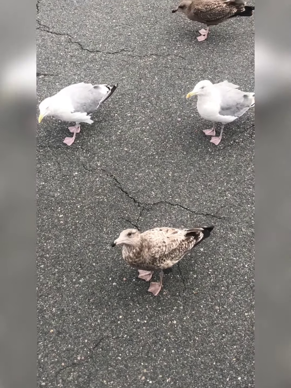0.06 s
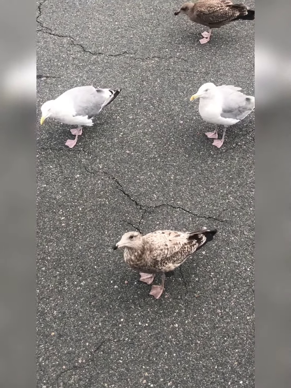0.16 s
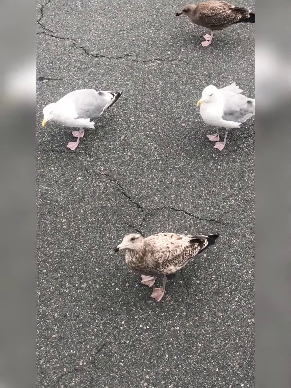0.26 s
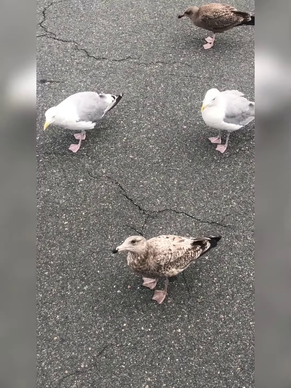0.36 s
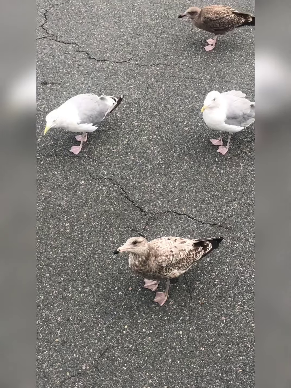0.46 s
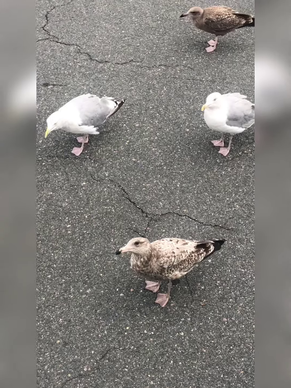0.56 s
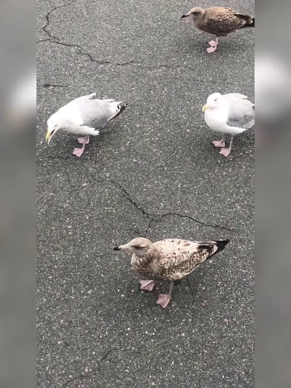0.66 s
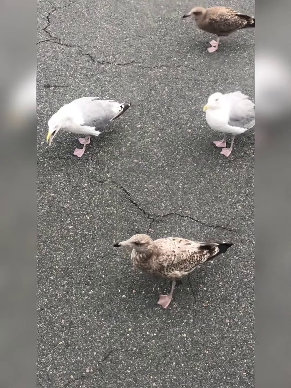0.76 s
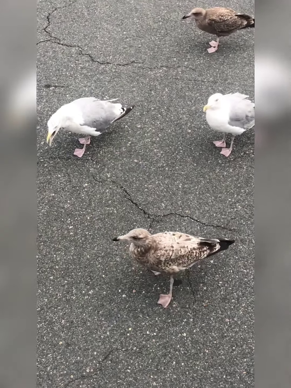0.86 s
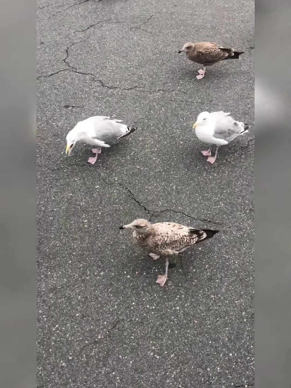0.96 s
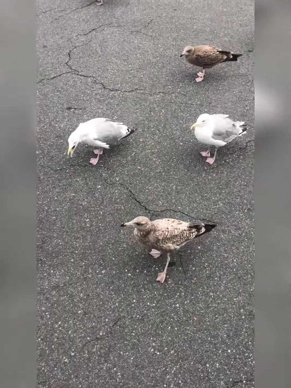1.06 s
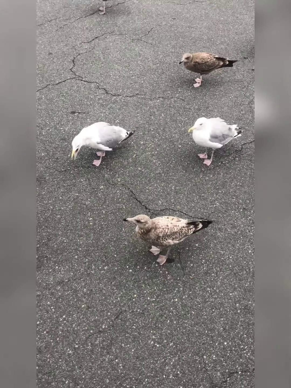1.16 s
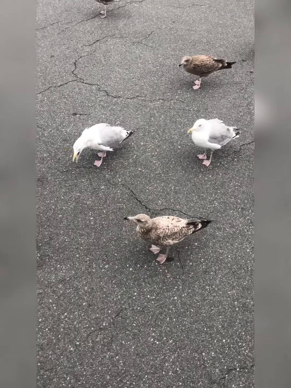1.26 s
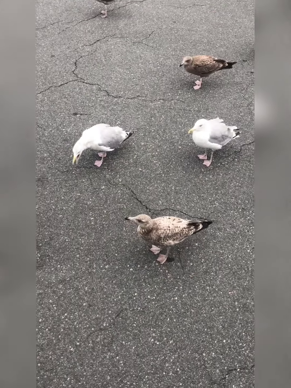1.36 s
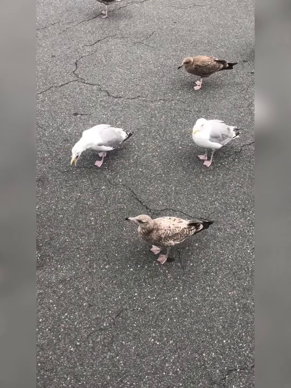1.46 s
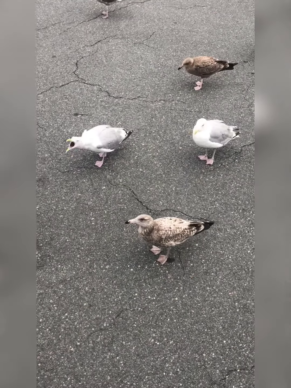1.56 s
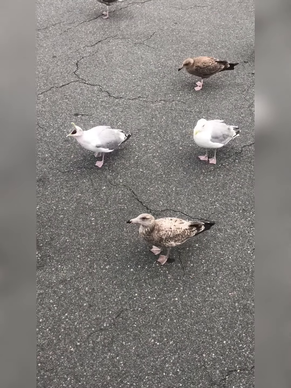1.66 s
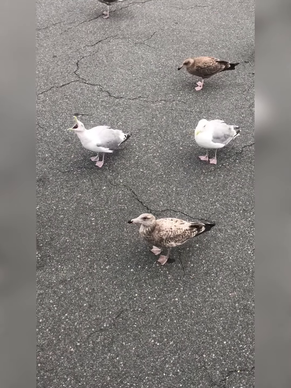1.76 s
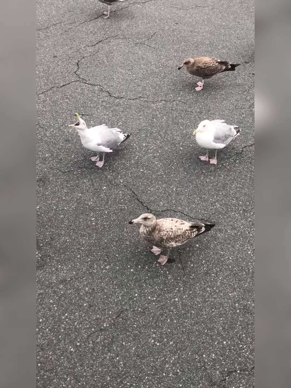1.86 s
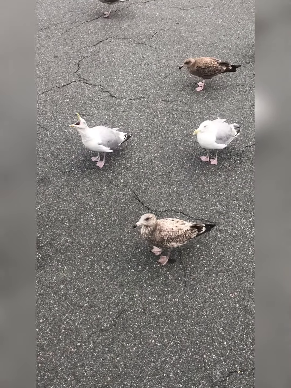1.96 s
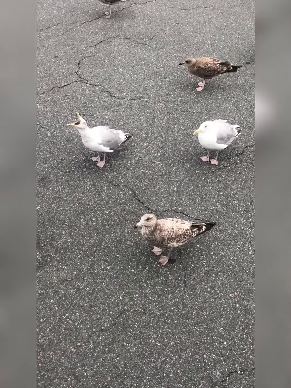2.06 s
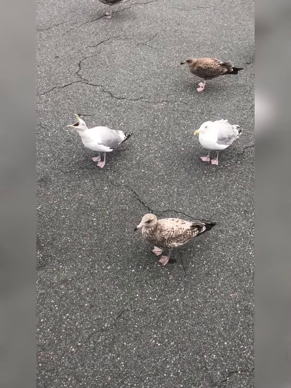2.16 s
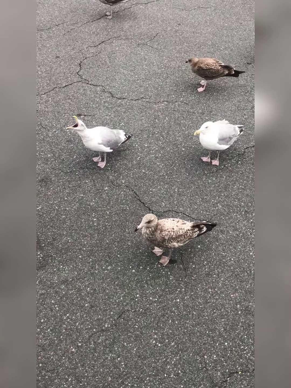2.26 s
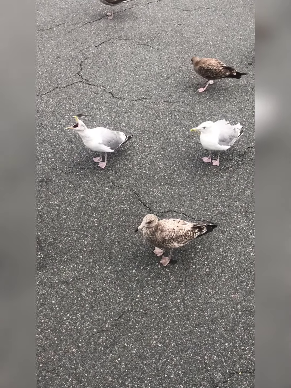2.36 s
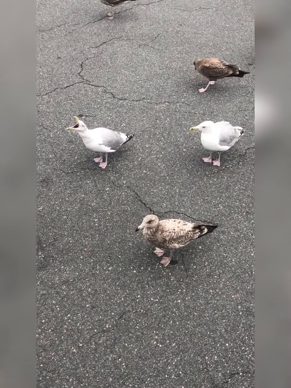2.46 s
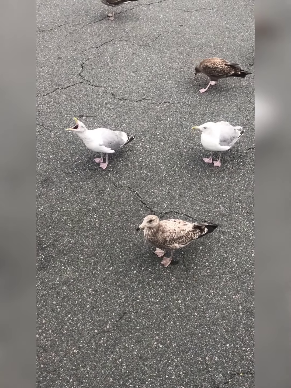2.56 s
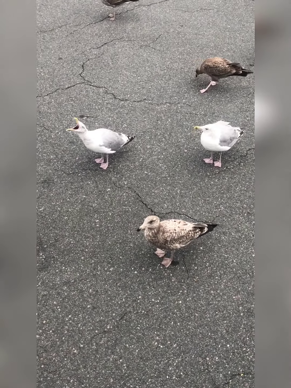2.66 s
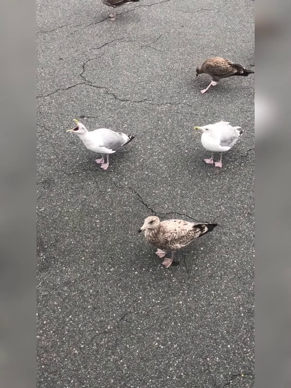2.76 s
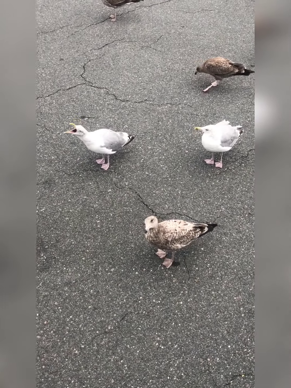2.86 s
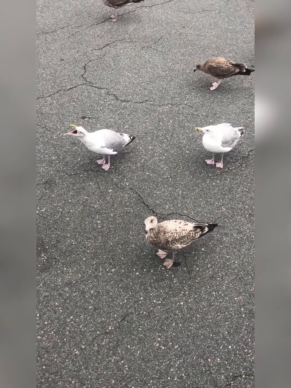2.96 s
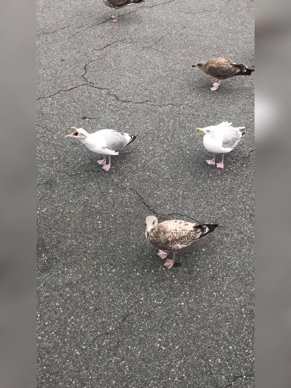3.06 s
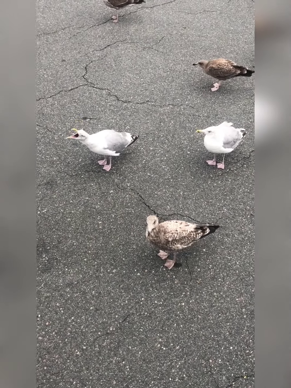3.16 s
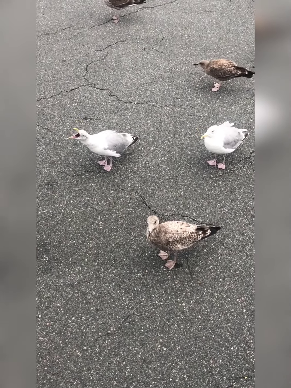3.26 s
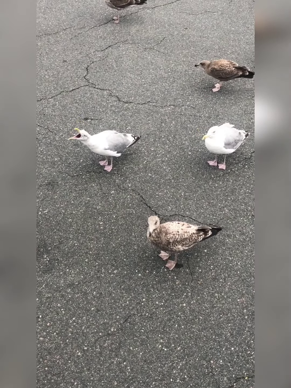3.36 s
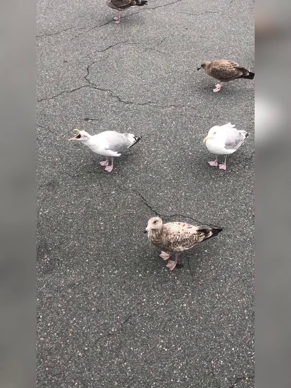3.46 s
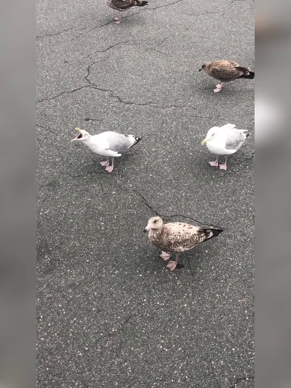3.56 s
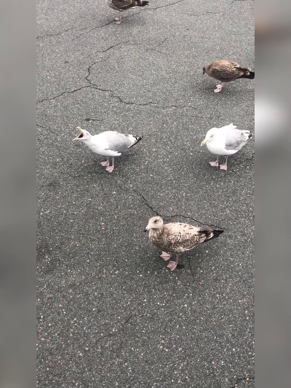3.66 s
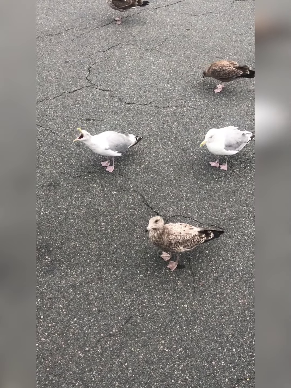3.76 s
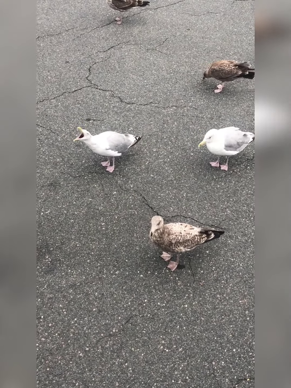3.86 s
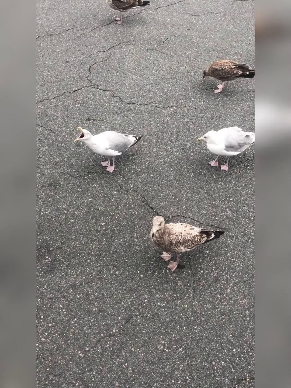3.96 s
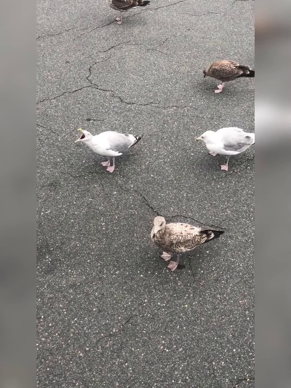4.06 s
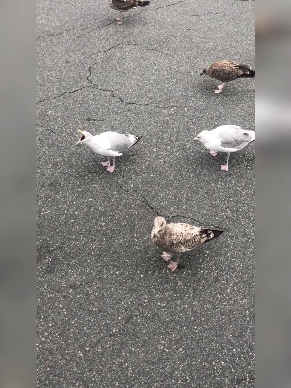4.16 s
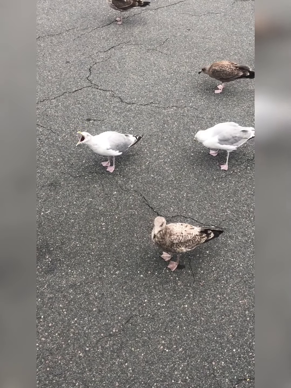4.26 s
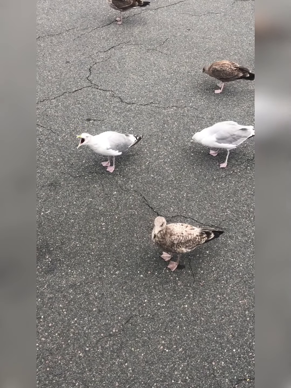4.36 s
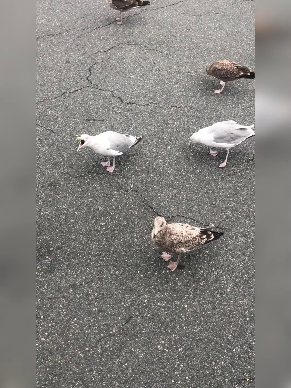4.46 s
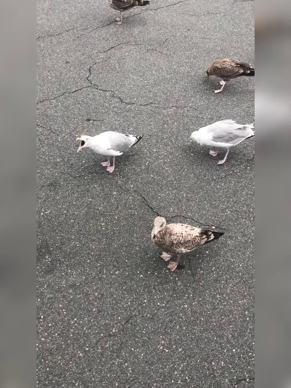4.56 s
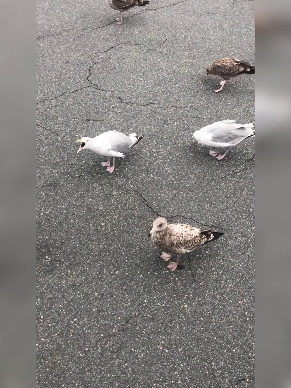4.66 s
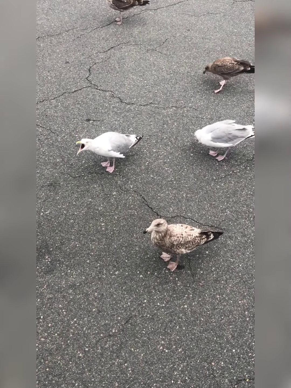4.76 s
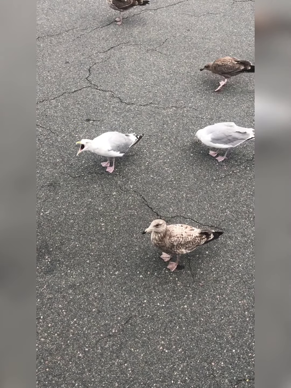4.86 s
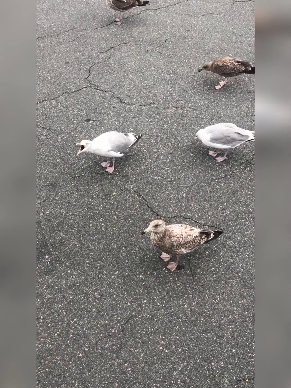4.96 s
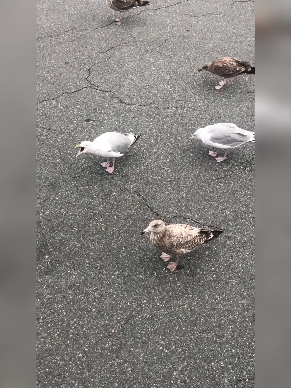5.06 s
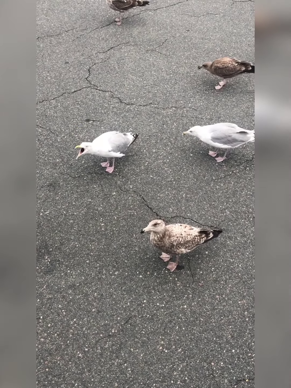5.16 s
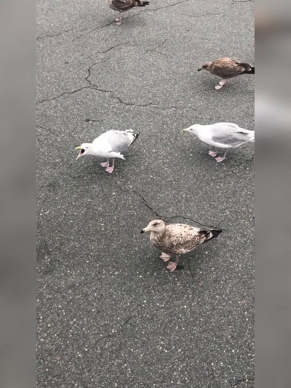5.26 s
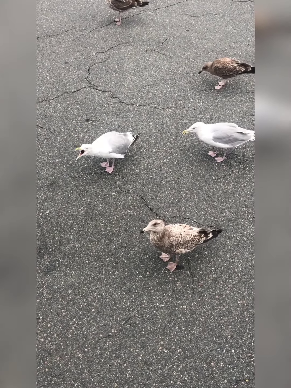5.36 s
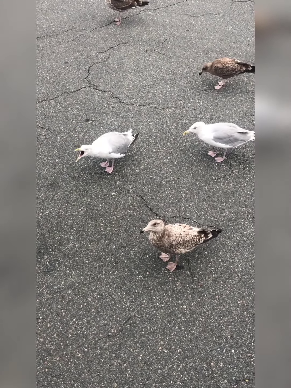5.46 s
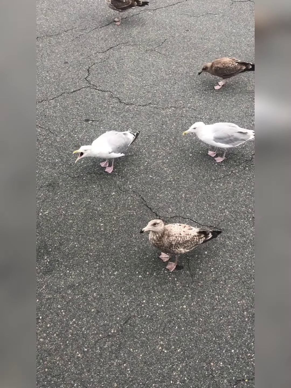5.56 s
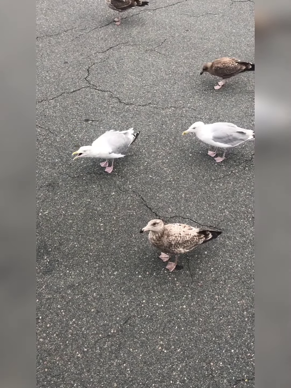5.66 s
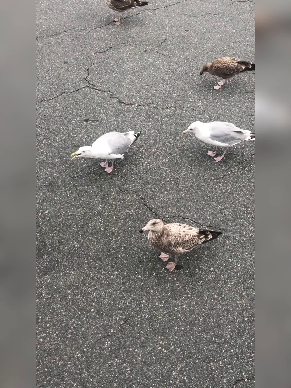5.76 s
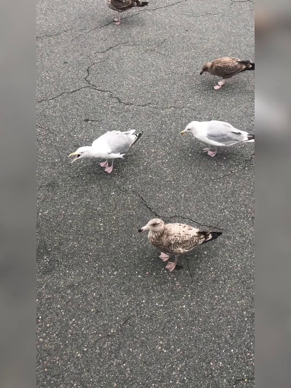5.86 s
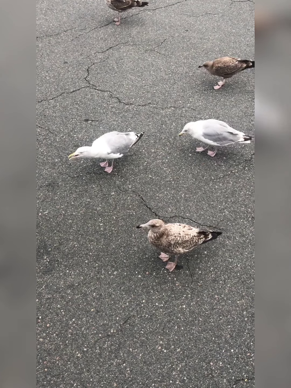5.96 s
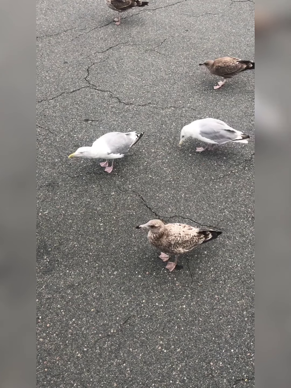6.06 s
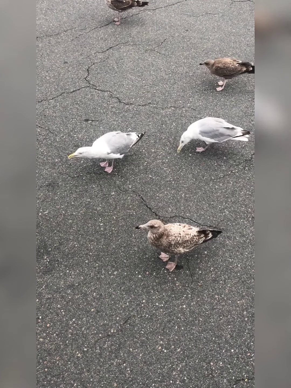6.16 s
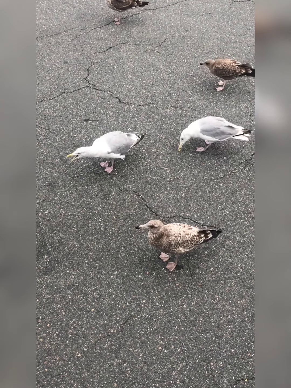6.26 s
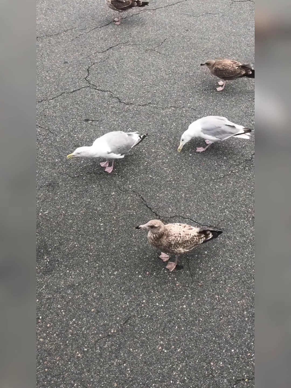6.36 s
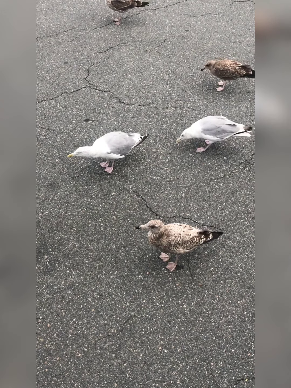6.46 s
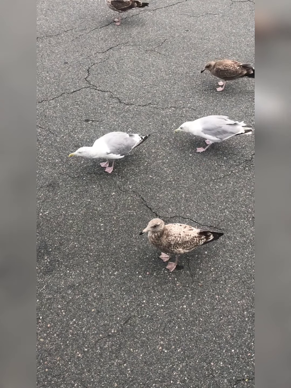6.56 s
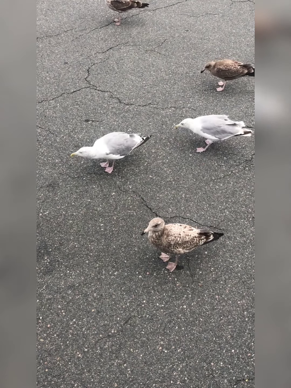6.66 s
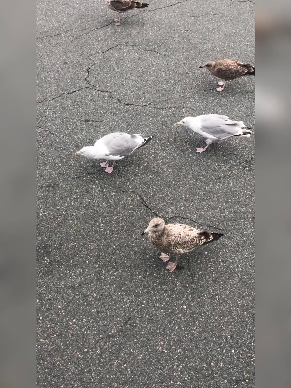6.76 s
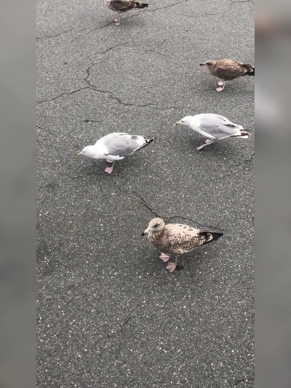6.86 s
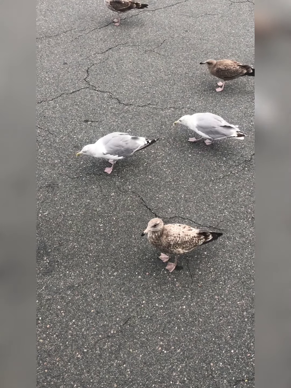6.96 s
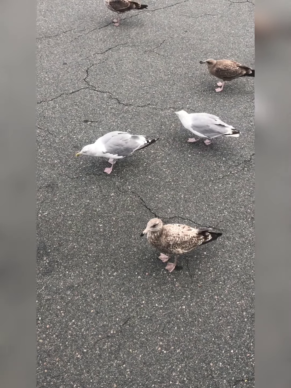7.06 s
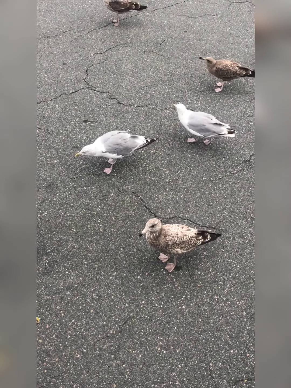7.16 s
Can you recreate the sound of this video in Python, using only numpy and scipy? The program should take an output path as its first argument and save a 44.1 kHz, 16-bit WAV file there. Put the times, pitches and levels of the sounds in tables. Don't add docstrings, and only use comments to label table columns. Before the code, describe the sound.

Dry, close, mono outdoor sound with a bare phone microphone in wind. Faint distant surf and traffic and a low wind rumble open it. Around 0.3 s a young gull peeps; from 0.6 to 1.1 s an adult gull a few steps away moans, hoots and rasps, with a thin two-toned wheeze beside it. A squeal swells at 1.4 s into a rough scream at 1.6 s. From 1.75 to 5.6 s come thirteen piercing yelps, evenly spaced about 0.3 s apart, each opening with a grunt, cracking, dropping in pitch and snapping shut. Wind flutters and pops near 1.1 s, thumps hardest at 2.4-2.6 s, and again at 3.2 s. Peeps return at 2 s; another bird croaks at 4.9 s. Two lower mews follow at 5.8 and 6.2 s, with peeping and wheezing. Croaks at 6.75 and 7.05 s and thin whistles trail off until about 7.2 s, over softer gusts.

```python
import sys
import numpy as np
from scipy import signal
from scipy.fft import rfft, irfft, next_fast_len
from scipy.io import wavfile
from scipy.ndimage import uniform_filter1d, map_coordinates

SR = 44100
rng = np.random.default_rng(int(sys.argv[2]) if len(sys.argv) > 2 else 0)


def boost(x):
    u = np.asarray(x, float) / 20
    return 10 ** u


def int16_out(signal):
    q = np.round(np.clip(np.atleast_2d(signal).T, -1, 1) * 32767)
    wavfile.write(sys.argv[1], SR, q.astype(np.int16))


N = 318402
TOP_HZ = 15780

# f/Hz, width/Hz, level/dB
THROAT = [(1200, 325, 6), (1550, 314, 4.5), (2300, 310, 3), (3085, 435, 0.5), (4300, 200, -6),
          (7100, 2600, -20.5), (10300, 4300, -39)]
# grunt t/s, break t/s, snap t/s, held high tone level/dB, falling cry level/dB
YELPS = [(1.754, 1.86, 1.936, -15, -13), (2.041, 2.14, 2.218, -25, -16.5), (2.337, 2.436, 2.51, -53, -20.5),
         (2.635, 2.74, 2.808, -61, -16.5), (2.941, 3.037, 3.108, -28.5, -16),
         (3.245, 3.348, 3.411, -57, -14), (3.553, 3.651, 3.714, -29, -13.5), (3.861, 3.96, 4.024, -56, -14),
         (4.168, 4.256, 4.328, -22, -12.5), (4.475, 4.57, 4.64, -20, -17), (4.788, 4.884, 4.953, -25, -16),
         (5.115, 5.208, 5.276, -27.5, -14), (5.434, 5.525, 5.593, -38, -15.5)]


def unit(x):
    return x / np.sqrt(np.mean(np.abs(x) ** 2) + 1e-20)


def wobble(rate, size=N):
    knots = rng.standard_normal(int(size * rate / SR) + 4)
    return map_coordinates(knots, [np.arange(size) * rate / SR])


def filtered(x, response):
    m = next_fast_len(len(x) + 8192)
    return irfft(rfft(x, m) * response(np.fft.rfftfreq(m, 1 / SR)), m)[:len(x)]


def coloured(points):
    hz, db = np.transpose(points)
    return unit(filtered(rng.standard_normal(N), lambda f: boost(np.interp(np.log(f + 1), np.log(hz), db))))


def resonances(modes):
    return lambda f: sum((-1) ** k * boost(db) * 1j * f * w / (c * c - f * f + 1j * f * w)
                         for k, (c, w, db) in enumerate(modes))


def span(rows, fade=0.0027):
    s, *cols = np.transpose(rows)
    where = slice(round((s[0] - fade) * SR), min(N, round((s[-1] + fade) * SR)))
    t = np.arange(where.start, where.stop) / SR
    edge = np.clip(np.minimum(t - t[0], s[-1] + fade - t) / (2 * fade), 0, 1)
    return where, edge, [np.interp(t, s, c) for c in cols]


def tones(notes, third_db, slope_db, open_db=0, lift_db=0, shake=np.zeros(N)):
    out, first = np.zeros(N, complex), np.zeros(N, complex)
    for rows in notes:
        where, edge, (hz, one_db, two_db) = span(rows)
        size, shaken = len(hz), shake[where]
        wandering_hz = hz * (1 + (.002 + .045 * shaken) * wobble(300, size))
        turn = np.exp(2j * np.pi * np.cumsum(wandering_hz) / SR)
        bill = np.clip((1 - hz / hz.max()) / 0.061, 0, 1)
        loudest_db = np.maximum(one_db, two_db)
        top_db = loudest_db + third_db + open_db * bill
        odd_db = 2.6 * np.minimum(one_db - two_db + 16, 0)
        power = turn ** 2
        wave = boost(one_db) * turn + boost(two_db) * power
        for k in range(3, 13):
            power = power * turn
            partial_db = top_db + slope_db * 4.95 * np.log2(k / 3) + k % 2 * odd_db
            if k == 3:
                partial_db = partial_db + lift_db * (1 - .6 * bill)
            partial_db = partial_db + 3.0 * wobble(28.2, size)
            wave += (k * hz < TOP_HZ) * boost(partial_db) * power * np.exp(2j * np.pi * rng.random())
        tremor = 1 + shaken * (wobble(260, size) + 1j * wobble(260, size)) + .04 * wobble(200, size)
        tremor += .3 * np.clip((-21 - loudest_db) / 8, 0, 1) * wobble(110, size)
        out[where] += np.sqrt(2) * edge * wave * tremor
        first[where] += edge * boost(one_db) * turn
    return out, first


def pulses(rate, irregular, size):
    count = int(size * rate / SR) + 1
    jitter = .6 * irregular ** 2 * rng.standard_normal(count)
    drift = .05 * irregular * wobble(SR / 8, count)
    at = np.cumsum(SR / rate * np.exp(jitter + drift))
    inside = at < size - 1
    strength = boost(3 * irregular * rng.standard_normal(count))
    train = np.bincount(at[inside].astype(int), strength[inside], size)
    return unit(train) + .5 * irregular ** 2 * rng.standard_normal(size)


def adult():
    # t/s, f/Hz, first partial level/dB, second partial level/dB
    lead_high = [
        [(0.625, 1932, -45.5, -37.5), (0.739, 1993, -43, -28)],
        [(0.812, 1844, -33, -68.5), (0.864, 1882, -24.5, -60), (0.882, 1960, -28, -60), (0.9, 1960, -48, -70)],
        [(1.018, 1932, -27, -63), (1.048, 1812, -26, -67), (1.066, 1940, -24, -64)],
        [(1.418, 1960, -29, -62), (1.528, 1940, -17, -39), (1.594, 1960, -25, -37.5)],
        [(5.807, 1990, -30, -49), (5.829, 2030, -56.5, -34)],
    ]
    lead_low = [
        [(0.618, 1271, -21.5, -29.5), (0.666, 1342, -16.5, -18), (0.73, 1315, -14, -29),
         (0.79, 1299, -17.5, -53), (0.86, 1286, -30, -50)],
        [(0.895, 1290, -62, -48), (0.908, 1282, -55, -32), (0.918, 1279, -48, -20), (0.96, 1280, -42, -19),
         (0.998, 1272, -46, -19), (1.015, 1255, -50, -13), (1.026, 1215, -40, -24)],
        [(1.023, 1230, -19, -30), (1.038, 1350, -19, -40), (1.048, 1300, -30, -45), (1.056, 1300, -13, -35),
         (1.064, 1300, -28, -40), (1.082, 1200, -30, -50)],
        [(1.361, 1280, -25, -27), (1.37, 1334, -9.5, -11), (1.392, 1426, -20, -19), (1.43, 1310, -48, -36)],
        [(1.595, 1253, -46, -9.5), (1.611, 1193, -43, -12.5)],
        [(1.615, 1550, -37, -57), (1.66, 1488, -16, -24), (1.675, 1440, -19, -18), (1.69, 1390, -24, -20),
         (1.703, 1385, -27, -40), (1.72, 1380, -34, -60), (1.74, 1400, -31, -70)],
        [(1.743, 1010, -36, -30), (1.755, 1110, -30, -24), (1.764, 1190, -24, -13), (1.775, 1240, -25, -18),
         (1.786, 1270, -30, -28)],
    ]
    croak_tones = [
        [(4.87, 1290, -36, -56), (4.95, 1270, -32.5, -55)],
        [(4.965, 1459, -36, -56), (5.0, 1430, -33, -55), (5.02, 1460, -40, -55), (5.06, 1560, -44, -60)],
        [(5.04, 1240, -42, -60), (5.052, 1220, -34, -55), (5.065, 1200, -42, -60)],
        [(7.03, 1290, -44, -40), (7.05, 1265, -36, -39), (7.085, 1180, -35, -43), (7.11, 1130, -48, -52)],
        [(7.08, 1560, -46, -60), (7.095, 1500, -40, -55), (7.12, 1400, -48, -60)],
    ]
    scream_rows = [(1.613, 1869, -25, -14.5), (1.65, 1830, -25, -15), (1.664, 1800, -28, -27)]
    # f/Hz, level/dB per Hz
    breath_colour = [(700, -26), (1500, 3.5), (4000, -4), (9000, -12.5), (10500, -24), (13000, -16),
                     (16000, -18)]
    rasp, shake = rasps()
    yelp_high, yelp_low = yelps()
    high = tones(lead_high, third_db=-36, slope_db=-5, open_db=20)[0]
    high += tones(yelp_high, third_db=-39, slope_db=-3.5, open_db=22.5)[0]
    scream, scream_first = tones([scream_rows], third_db=-16.5, slope_db=-2, shake=.4 * shake)
    high += scream
    low, low_first = np.sum([
        tones(lead_low + croak_tones[:3], third_db=-22, slope_db=-4.2, open_db=2.5, shake=shake),
        tones(yelp_low, third_db=-19.5, slope_db=-7, shake=shake + .12),
        tones(mews(), third_db=-43, slope_db=-2.5, open_db=17, lift_db=24),
        tones(croak_tones[3:], third_db=-5, slope_db=-4.5, shake=shake)], axis=0)
    sum_and_difference = np.real(high * (boost(2) * low_first + boost(9) * np.conj(low_first)))
    mixed = filtered(sum_and_difference, lambda hz: hz > 1000)
    beat = np.real(np.exp(1j * np.angle(scream_first * np.conj(low_first))))
    mixed += np.real(scream) * (boost(-9) * beat + boost(-15) * (2 * beat ** 2 - 1))
    voice = high + low
    breath = boost(-41) * np.abs(voice) * (1 + 11 * shake) * coloured(breath_colour)
    return np.real(voice) + mixed + rasp + breath


def yelps():
    # t/s, held f/Hz, first over second partial level/dB, ground notch level/dB, low tone level/dB
    posture_rows = [(1.86, 1992, 1, -1, -26.5), (2.14, 2010, 2.5, -1, -25), (2.5, 2040, 4.5, -1.5, -23),
                    (2.8, 2038, -1, -0.5, -24.5), (3.1, 2067, 1.5, -17, -27), (3.35, 2020, 1.1, -14, -27.5),
                    (3.65, 1976, 0.5, -10.5, -28), (4.0, 2035, -2, -13, -29), (4.3, 2067, -0.5, -7.5, -40),
                    (4.6, 2084, 3, -1.5, -52), (4.9, 2090, 2.1, -1.6, -45), (5.2, 2097, 0.9, -1.8, -47),
                    (5.53, 2105, -0.5, -2, -42)]
    # share of fall, share of pitch drop, first partial level/dB, second level/dB, notch share
    fall_rows = [
        (0, 0.069, -5, -8.5, 0),
        (.25, 0.513, -2, -1, 0.71),
        (.55, 0.648, 1.5, -0.5, 0.78),
        (.8, .78, -1, -3, 0.41),
        (1, 0.98, -6.5, -14, 0),
    ]
    hold_after_s, catch_s, break_s, snap_early_s = .026, .012, 0.0092, 0.0048
    sag_hz, fall_end_hz, swell_db = 50, 1678, 7
    high, low = [], []
    s, *posture = np.transpose(posture_rows)
    for k, (grunt, brk, snap, held_db, cry_db) in enumerate(YELPS):
        hz, tilt_db, notch_db, low_db = (np.interp(brk, s, c) for c in posture)
        catch, soft_db = grunt + hold_after_s, held_db - swell_db
        catch_db = max(-50 + 4.2 * brk, soft_db)
        over_db = -25.5 + 5 * brk + 1.36 * notch_db
        hold = [(catch, hz - sag_hz, catch_db, catch_db - 3),
                (catch + catch_s, hz - sag_hz, soft_db, soft_db + over_db),
                (brk - break_s, hz, held_db, held_db + over_db)]
        fall_s = snap - snap_early_s - brk
        fall = [(brk + u * fall_s, hz - drop * (hz - fall_end_hz),
                 cry_db + tilt_db + one + notch * notch_db, cry_db + two)
                for u, drop, one, two, notch in fall_rows]
        high.append(hold + fall)
        start, stop, second_db = grunt + .014, brk - .012, low_db - 4.5
        if k:
            low.append([(start, 1222, low_db - 3, second_db),
                        (start + .3 * (stop - start), 1250, low_db, second_db - 3.0),
                        (stop, 1290, low_db - 11, second_db - 9.5)])
    return high, low


def mews():
    # t/s, length/s, f/Hz, level/dB, swell/dB
    mew_events = [
        (5.8, 0.15, 1425, -12, -12.5),
        (6.2, 0.14, 1433, -16, 0.5),
    ]
    # share of length, share of pitch, first partial level/dB, second partial level/dB, share of swell
    mew_shape = [
        (0, 0.92, -8, -17, 0.54),
        (.07, 0.98, -2, -5, 0.97),
        (.47, 0.99, -0.5, -2.5, 0.66),
        (.65, .93, 3, -1.5, 0.26),
        (.8, .86, -0.5, -4, 0),
        (1, .76, -11.5, -32, 0.14),
    ]
    return [[(s + u * length, hz * share, db + one + 0.56 * soft * swell_db, db + two + 1.7 * soft * swell_db)
             for u, share, one, two, soft in mew_shape]
            for s, length, hz, db, swell_db in mew_events]


def rasps():
    # t/s, level/dB
    rasp_rows = [
        [(0.735, -44), (0.748, -32), (0.8, -37), (0.847, -42), (0.875, -60)],
        [(1.015, -51), (1.055, -29), (1.085, -45)],
        [(1.608, -26), (1.62, -37), (1.645, -33), (1.662, -21)],
        [(1.655, -21), (1.688, -26), (1.705, -46), (1.735, -42), (1.75, -26)],
        [(4.86, -45), (4.89, -36), (4.97, -36), (5.0, -41), (5.05, -38), (5.09, -40), (5.125, -50)],
        [(6.725, -52), (6.75, -38), (6.762, -42), (6.775, -31), (6.8, -33), (6.815, -43), (6.835, -54)],
        [(7.025, -50), (7.05, -42), (7.09, -42), (7.13, -50)],
    ]
    # pulse rate/Hz, irregularity [0-1], hollow throat share [0-1]
    rasp_kinds = [(330, .8, .1), (310, .7, .1), (308, .3, .3), (350, .8, .3), (360, .22, .8),
                  (337, .2, .75), (400, .7, .7)]
    # f/Hz, width/Hz, level/dB
    hollow_modes = [(1550, 550, 0), (3650, 800, 0), (5000, 600, -6), (6450, 600, -7), (8700, 900, -10),
                    (10300, 1000, -9), (14000, 2500, -15)]
    throat_wander = .07
    rasp, shake = np.zeros(N), np.zeros(N)
    for rows, (rate, irregular, hollow) in zip(rasp_rows, rasp_kinds):
        where, edge, (db,) = span(rows, fade=0.0074)
        size = len(db)
        slaps = pulses(rate, irregular, size)
        share = np.clip(hollow, 0, 1)

        def throat(f):
            return (1 - share) * resonances(THROAT)(f) + share * 1.5 * resonances(hollow_modes)(f) ** 2

        mouth = np.clip(.5 + .5 * wobble(25, size), 0, 1)
        narrow = filtered(slaps, lambda f: throat(f * (1 + throat_wander)))
        wide = filtered(slaps, lambda f: throat(f * (1 - throat_wander)))
        voiced = (1.82 - .8 * share) * patchy(mouth * wide + (1 - mouth) * narrow)
        rasp[where] += edge * boost(db + 2.2 * wobble(60, size)) * voiced
        shake[where] += 0.38 * edge * irregular
    return rasp, shake


def patchy(x):
    z = signal.stft(x, nperseg=256)[2]
    field = uniform_filter1d(rng.standard_normal(z.shape), size=4, axis=0)
    field = uniform_filter1d(field, size=7, axis=1)
    return unit(signal.istft(z * boost(2.5 * unit(field)), nperseg=256)[1][:len(x)])


def grunts():
    # peak t/s, level/dB
    other_openers = [
        (0.608, -32),
        (1.362, -32.5),
        (5.775, -25.5),
        (6.181, -21.5),
    ]
    # peak t/s, level/dB
    mew_closers = [
        (5.942, -32),
        (6.337, -30),
    ]
    # opening level/dB, closing level/dB
    yelp_grunts = [(-24, -20), (-24, -20), (-23, -20), (-23, -20), (-23, -20), (-23, -20), (-23, -21),
                   (-23, -20), (-23, -20), (-23, -20), (-23, -20), (-23, -20), (-23, -20)]
    # t/s, f/Hz
    closing_blip = [
        (3.45, 1400),
        (4.3, 960),
    ]
    opening_blip = [(2, 1070), (4.5, 1150)]  # t/s, f/Hz
    openers = other_openers + [(row[0], db[0]) for row, db in zip(YELPS, yelp_grunts)]
    closers = mew_closers + [(row[2], db[1]) for row, db in zip(YELPS, yelp_grunts)]
    out, t = np.zeros(N), np.arange(-3000, 3000) / SR
    # events, rise/s, fall/s, slap rate/Hz, blip level/dB, blip t/s, blip pitch
    kinds = ((openers, .012, .003, 250, -4, .004, opening_blip),
             (closers, .003, .006, 420, -9, .001, closing_blip))
    for events, rise, fall, rate, blip_db, blip_s, blip_hz in kinds:
        for s, db in events:
            lumps = boost(4 * wobble(130, len(t)))
            shape = np.exp(np.where(t < 0, t / rise, -t / fall)) * lumps
            stretch = np.exp(.06 * rng.standard_normal(2))
            burst = filtered(shape * pulses(rate * stretch[0], .4, len(t)),
                             lambda f: resonances(THROAT)(f * stretch[1]) * (f > 800))
            turn = 2 * np.pi * np.interp(s, *np.transpose(blip_hz)) * stretch[1] ** .2 * t
            blip = np.sin(turn) + 0.64 * np.sin(2 * turn) + 0.4 * np.sin(3 * turn)
            blip = blip * np.exp(-((t - blip_s) / 0.0047) ** 2)
            out[round(s * SR) - 3000:][:len(t)] += boost(db + 8.0) * (burst + boost(blip_db) * blip)
    return out


def young():
    # t/s after its start, f/Hz, first partial level/dB, second partial level/dB
    flourish = [
        [(0, 3510, -49, -66), (.007, 4000, -43, -31.5), (.016, 4900, -49, -46)],
        [(.014, 3400, -46, -64), (.024, 3330, -27, -32.5), (.037, 3200, -31.5, -36.5), (.052, 3030, -44, -40)],
        [(.128, 3300, -41, -44), (.14, 3480, -27, -35), (.162, 3620, -31, -53)],
    ]
    # t/s, level/dB
    peep_starts = [
        (.328, -3.5),
        (1.998, -3.5),
        (5.831, -2),
    ]
    # t/s, f/Hz, first partial level/dB, second partial level/dB
    whistles = [
        [(0.399, 2943, -57, -44), (0.408, 2970, -60, -48)],
        [(4.735, 4000, -66, -72), (4.78, 3978, -40, -72)],
        [(4.8, 3250, -50, -71), (4.842, 3160, -32, -53), (4.89, 2960, -56, -63)],
        [(6.55, 3830, -66, -86), (6.88, 3950, -64, -86), (6.93, 3880, -55, -75), (6.95, 3800, -50, -66),
         (6.978, 3980, -46, -62), (6.99, 3850, -54, -70)],
        [(6.96, 4500, -62, -75), (6.978, 4700, -55, -72), (6.988, 4650, -62, -75)],
        [(6.02, 4520, -52, -70), (6.04, 4450, -48, -68), (6.085, 4760, -50, -68), (6.14, 4330, -50, -68),
         (6.17, 4450, -54, -70)],
        [(6.95, 3276, -42, -85), (7.02, 3200, -40, -64), (7.05, 3130, -46, -44), (7.11, 3080, -45, -49),
         (7.145, 3110, -46, -47), (7.16, 3250, -54, -50)],
        [(7.158, 3930, -41, -61), (7.173, 4070, -31.5, -47)],
        [(7.175, 4660, -41, -44.5), (7.22, 4650, -41, -50)],
    ]
    # t/s, f/Hz, level/dB
    wheeze_left = [
        [(.49, 3620, -41.5), (.66, 3610, -31.5)],
        [(2.215, 3550, -48), (2.26, 3770, -38.5), (2.325, 3300, -55)],
        [(5.995, 3430, -40), (6.055, 3380, -38), (6.09, 3650, -40.5), (6.13, 3480, -40.5), (6.18, 3500, -42),
         (6.27, 3430, -55)],
    ]
    wheeze_right = [
        [(0.485, 4440, -39), (0.509, 4300, -43), (0.63, 4200, -46)],
        [(2.155, 4300, -33), (2.217, 4690, -56), (2.325, 4060, -50)],
        [(2.34, 4192, -40), (2.44, 4180, -47)],
        [(5.99, 4420, -38), (6.02, 4210, -41), (6.2, 4080, -45.5)],
    ]
    # f/Hz, level/dB per Hz
    wheeze_air = [(1500, -22), (3000, -8), (4600, 0), (6000, -8), (10000, -12), (16000, -22)]
    peeps = [[(s + dt, hz, a + db, b + db) for dt, hz, a, b in part]
             for s, db in peep_starts for part in flourish]
    out = np.real(tones(peeps + whistles, third_db=-26, slope_db=-0.5)[0])
    hiss = coloured(wheeze_air)
    # multiple of the pitch, level/dB
    sides = ((wheeze_left, [(1, -7.5), (1.45, -9), (2, -20), (2.5, -26)]),
             (wheeze_right, [(1, -2.5), (2, -18.5)]))
    for notes, orders in sides:
        for rows in notes:
            where, edge, (hz, db) = span(rows)
            size = len(hz)
            phase = 2 * np.pi * np.cumsum(hz * (1 + 0.0076 * wobble(120, size))) / SR
            for k, g in orders:
                level = boost(db + g + 1.6 * wobble(76, size))
                out[where] += np.sqrt(2) * edge * level * np.sin(k * phase)
            out[where] += edge * boost(db - 19) * hiss[where]
    return out


def wind():
    # peak t/s, level/dB, time to rise 23.55 dB/s, time to fall 23.55 dB/s
    gusts = [(0.0, -16.5, .1, 0.2), (1.12, -17.5, 0.1844, 1.0), (2.21, -21.5, 0.2, 0.15),
             (2.4, -9.5, 0, 0.32), (2.55, -7.5, 0.25, 0.0842), (3.182, -18, 0.16, 0.56),
             (3.861, -20, .13, 0.25), (4.062, -14, 0.08, 0.11), (4.599, -18.5, 0.05, 0.14),
             (4.72, -31, 0.3, 0.77), (5.748, -18, 0.22, 0.2058), (6.502, -26.5, 0.21, 0.13),
             (6.638, -20.5, 0.06, 0.09)]
    # f/Hz, level/dB per Hz
    rumble_colour = [(20, -42), (40, 3.5), (70, 9), (150, 9), (250, 3.5), (500, -57.5)]
    flutter_colour = [(35, -26), (70, -5), (130, 0), (280, -2), (500, -5), (900, -21), (1600, -38),
                      (3500, -70)]
    # t/s, peak level/dB, length/s
    bursts = [(1.013, -24, 0.018), (1.079, -15, 0.018), (1.092, -7, 0.018), (1.109, -14, 0.018),
              (1.139, -8, 0.018), (1.154, -10, 0.018), (1.194, -12, 0.018), (1.249, -14, 0.018),
              (1.267, -8, 0.018), (1.284, -11, 0.018), (1.31, -10, 0.018), (1.324, -13, 0.018),
              (1.464, -13, 0.018), (1.535, -20, 0.018), (1.579, -19, 0.018), (1.702, -20, 0.018),
              (1.752, -17, 0.018), (1.944, -21, 0.018), (2.017, -15, 0.018), (2.197, -14, 0.018),
              (2.311, -16, 0.018), (2.383, 0, 0.018), (2.409, -7, 0.018), (2.433, 0, 0.018),
              (2.459, -5, 0.018), (2.483, -3, 0.018), (2.514, -4, 0.018), (2.553, -2, 0.018),
              (2.646, -18, 0.018), (2.725, -20, 0.018), (2.794, -21, 0.018), (2.944, -23, 0.018),
              (3.124, -20, 0.018), (3.176, -5, 0.018), (3.207, -8, 0.018), (3.288, -4, 0.018),
              (3.304, -7, 0.018), (3.372, -22, 0.018), (3.432, -16, 0.018), (3.495, -21, 0.018),
              (3.821, -12, 0.018), (3.857, -13, 0.018), (3.92, -11, 0.018), (3.986, -17, 0.018),
              (4.06, -10, 0.018), (4.137, -22, 0.018), (4.592, -11, 0.018), (4.659, -17, 0.018),
              (4.727, -16, 0.018), (4.753, -14, 0.018), (4.983, -26, 0.018), (5.122, -23, 0.018),
              (5.627, -23, 0.018), (5.671, -17, 0.018), (5.726, -13, 0.018), (5.759, -14, 0.018),
              (5.802, -12, 0.018), (6.452, -23, 0.018), (6.51, -21, 0.018), (6.626, -16, 0.018)]
    # t/s, peak level/dB
    pops = [(1.043, -30.5), (1.094, -15), (1.153, -22), (1.19, -20), (1.248, -21), (1.268, -13.5),
            (1.287, -19), (1.31, -16.5), (1.469, -28), (2.198, -26), (2.313, -24), (2.354, -27.5),
            (2.387, -6.5), (2.437, -1.5), (2.458, -10), (2.485, -6), (2.55, -4), (2.563, -4), (3.174, -6.5),
            (3.22, -15), (3.288, -13), (3.304, -13), (3.822, -19), (3.923, -17), (4.593, -24), (4.753, -19),
            (5.802, -16), (6.628, -25.5)]
    # t/s, peak level/dB
    snaps = [
        (1.268, -27),
        (2.437, -17),
        (2.563, -14),
        (3.174, -28),
    ]
    calm_db = -43
    t = np.arange(N) / SR
    power = boost(2 * calm_db)
    for s, db, rise, fall in gusts:
        with np.errstate(divide="ignore", invalid="ignore"):
            away = np.where(t < s, (s - t) / rise, (t - s) / fall)
        power = power + boost(2 * db - 47.1 * away)
    gust_db = 10 * np.log10(power)
    lumps = wobble(25) + wobble(70)

    def steady(x, size=7000):
        return x / np.sqrt(np.abs(uniform_filter1d(x ** 2, size=size)))

    out = boost(-14.0 + 0.63 * gust_db) * steady(boost(1.55 * lumps) * coloured(rumble_colour))
    flutter = coloured(flutter_colour)
    out += boost(-9.5 + .9 * gust_db) * steady(boost(4 * lumps) * flutter)
    packets = np.zeros(N)
    rise_s, fall_s, hold_share = .0015, .007, .7
    for s, db, length in bursts:
        near = slice(round((s - .02) * SR), round((s + .12) * SR))
        after = t[near] - s
        slope = np.minimum(after / rise_s, (hold_share * length - after) / fall_s)
        packets[near] += boost(2 * db) * np.exp(2 * np.minimum(0, slope))
    out += boost(-11.5) * np.sqrt(packets) * steady(flutter, size=600)
    u = t[:SR // 20]
    for s, db in pops:
        sweep_hz = 170 + 1000 * np.exp(rng.normal(0, 0.22) - u / 0.002845)
        puff = (1 - np.exp(-u / .0006)) * np.exp(-u / .006)
        out[round(s * SR):][:len(u)] += boost(db + 3.5) * np.sin(2 * np.pi * np.cumsum(sweep_hz) / SR) * puff
    for s, db in snaps:
        click = (1 - np.exp(-u / .00008)) * (1 - u / .0004) * np.exp(-u / .0003)
        out[round(s * SR):][:len(u)] += boost(db) * click
    return out


def walls(x):
    t = np.arange(SR // 2) / SR
    tail = rng.standard_normal(len(t)) * boost(-60 * t / .5) * (t > .03)
    return signal.fftconvolve(x, tail / np.linalg.norm(tail))[:N]


def far_air(birds):
    # f/Hz, level/dB per Hz
    air_colour = [(180, -8), (300, -12.5), (631, -12), (1870, -20.5), (2320, -25), (3940, -32),
                  (4280, -32.5), (15500, -49)]
    loudness = np.sqrt(np.abs(uniform_filter1d(birds ** 2, size=1500)))
    return boost(-44.5 + 1.0 * wobble(3.35)) * coloured(air_colour) / (1 + 12 * loudness)


def scene():
    birds = adult() + grunts() + young()
    return (birds + boost(-33.5) * walls(birds) + wind() + far_air(birds))[None]


def band_limit(x):
    return signal.sosfilt(signal.butter(12, 15750, fs=SR, output="sos"), x)


def record(dry):
    x = signal.sosfilt(signal.butter(N=3, Wn=45 / (SR / 2), btype="high", output="sos"), dry[0])
    x = x / (1 + np.abs(x / .95) ** 6) ** (1 / 6)
    mix = filtered(x, lambda hz: hz < TOP_HZ)[None]
    return band_limit(mix)


dry = scene()
out = record(dry)
int16_out(out)
```